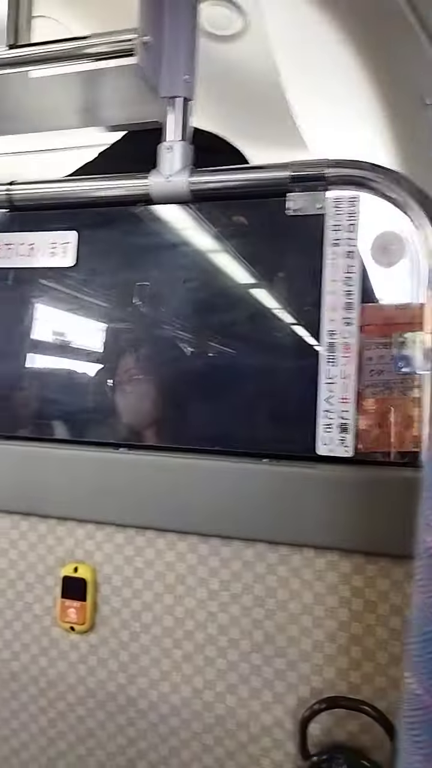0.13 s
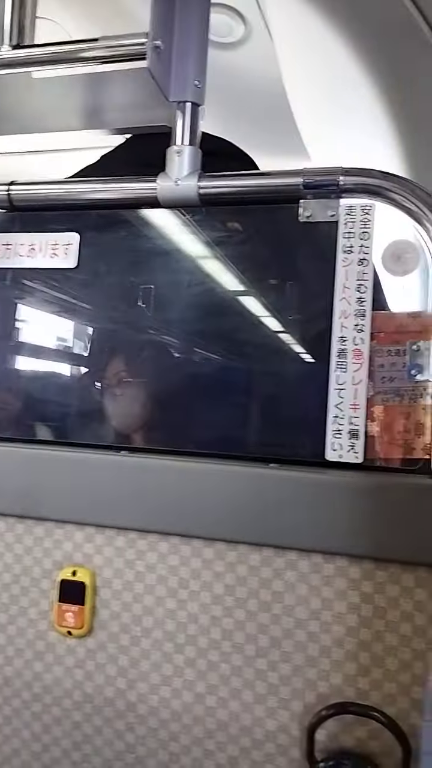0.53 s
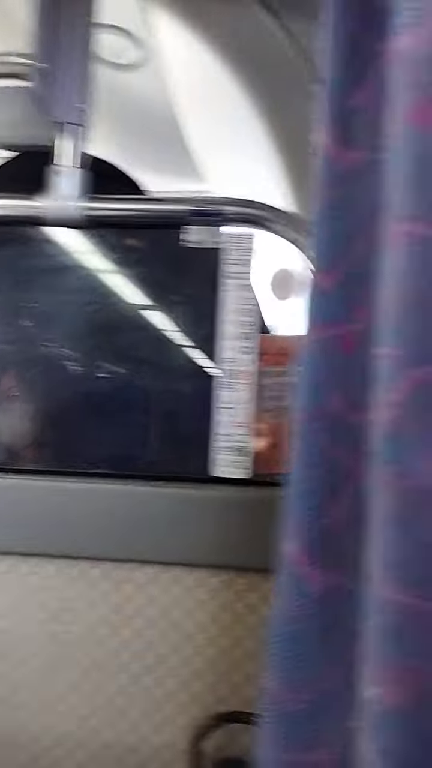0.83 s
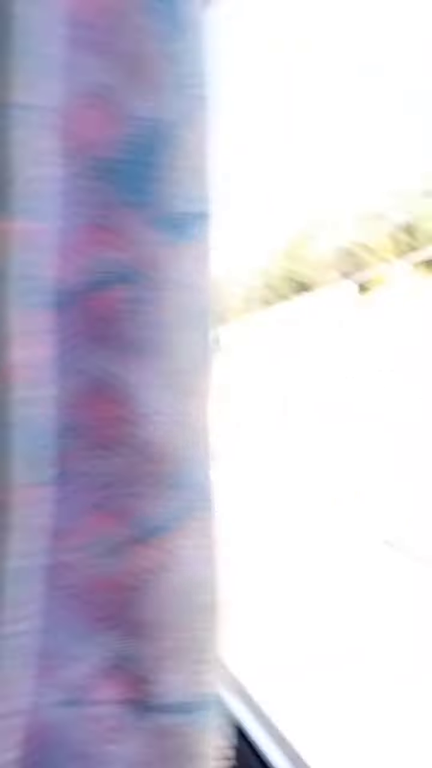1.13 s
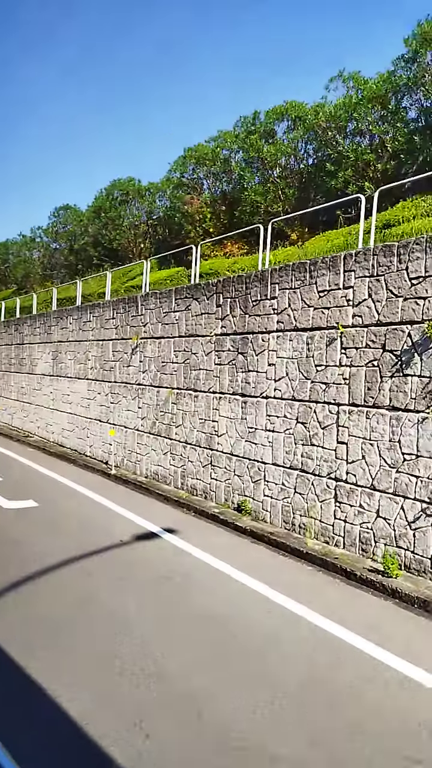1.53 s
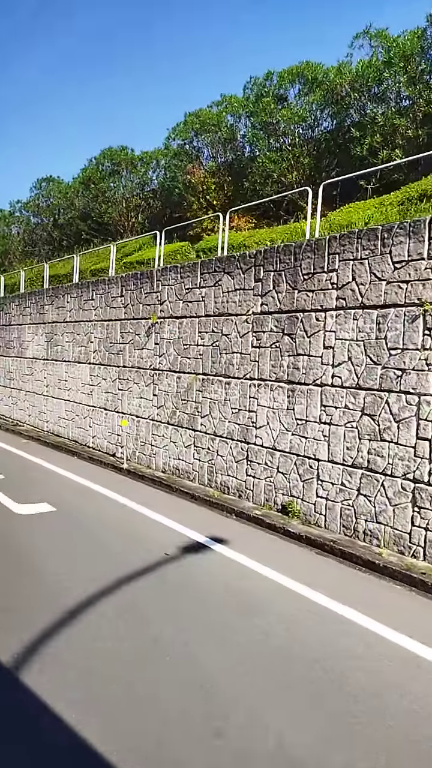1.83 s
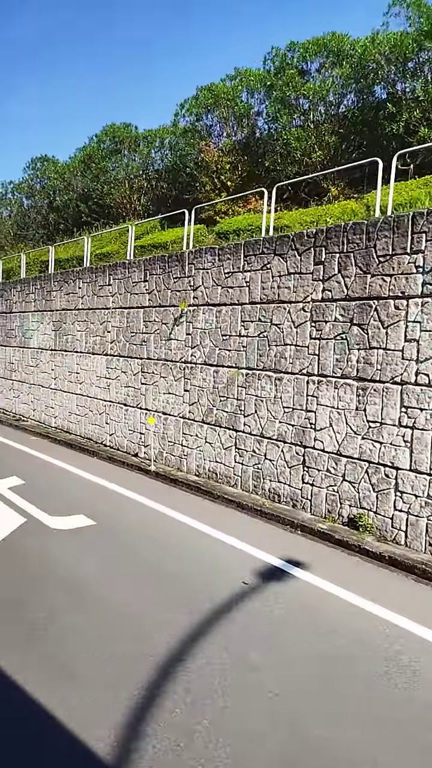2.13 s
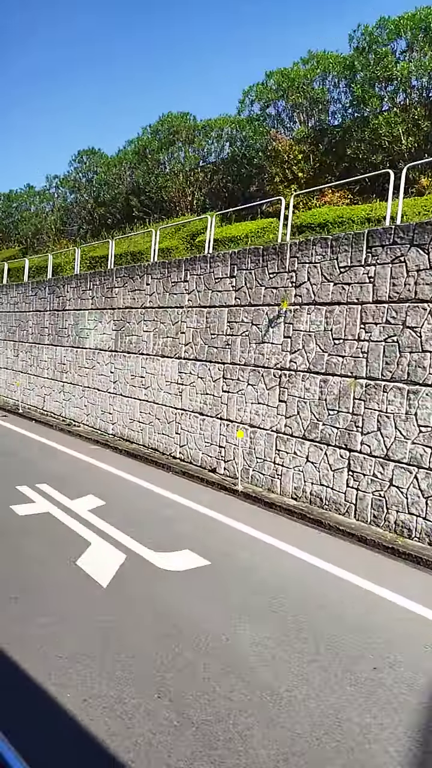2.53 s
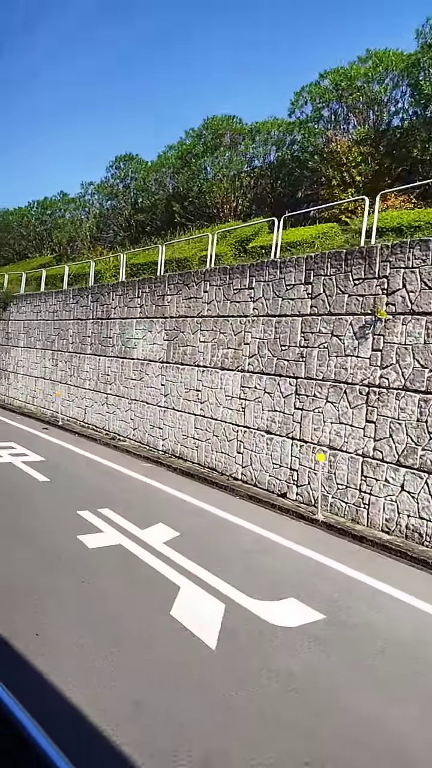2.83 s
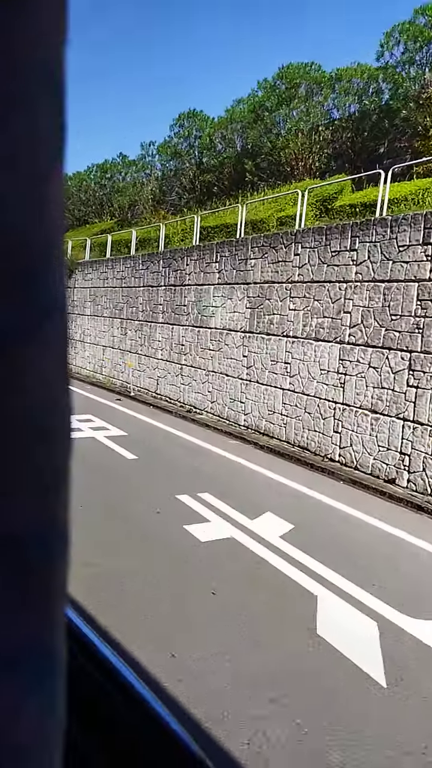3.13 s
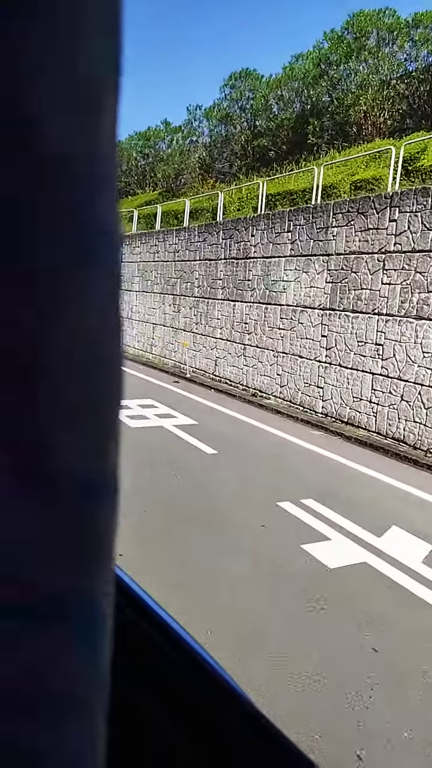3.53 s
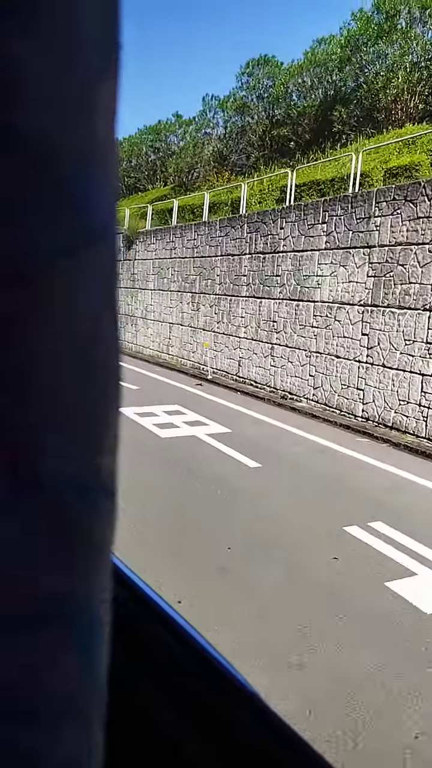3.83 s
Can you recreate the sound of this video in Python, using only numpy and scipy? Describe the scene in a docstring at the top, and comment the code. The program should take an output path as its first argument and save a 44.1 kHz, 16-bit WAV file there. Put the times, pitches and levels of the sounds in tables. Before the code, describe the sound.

A bus rumbles throughout, heard from inside, with low road noise and a wavering engine hum. From the start until about 1.7 seconds, a nearby curtain slides along its rail, hissing softly as plastic hooks click. Scattered dry ticks follow, and cloth rustles faintly on the left from 2.6 to 3.3 seconds and near 3.9. A faint ticking, probably the indicator, repeats every 0.4 seconds farther ahead.

```python
"""Inside a moving bus. Tyre and body noise, coloured by cabin resonances, rumbles under the engine's
wavering tones, and the cabin air throbs far below both. Far ahead something ticks evenly, probably the
indicator relay. Close by, a hand draws a window curtain aside: friction makes the runners hiss on the
rail, impacts set the plastic hooks ringing, and later the cloth rustles past on the left."""
import sys
import numpy as np
from scipy import signal
from scipy.fft import rfft, irfft
from scipy.io import wavfile

SR = 44100
rng = np.random.default_rng(int(sys.argv[2]) if len(sys.argv) > 2 else 0)


def wav_record(signal):
    """Record a signal, one row per channel, as 16-bit PCM in the file named by sys.argv[1]."""
    frames = np.transpose(np.atleast_2d(signal))
    bounded = np.clip(frames, -1, 1)
    # unit amplitude maps onto the largest positive 16-bit level
    quanta = np.round(bounded * 32767).astype(np.int16)
    wavfile.write(sys.argv[1], SR, quanta)


N = 176400
TIME, BIN_HZ = np.arange(N) / SR, np.fft.rfftfreq(N, 1 / SR)
BAND_EDGE_HZ = 15900


def amp(db):
    """Amplitude ratio of a level in decibels."""
    return 10 ** (np.asarray(db) / 20)


def unit(x):
    """Normalisation to rms 1."""
    return x / np.sqrt(np.mean(x ** 2) + 1e-20)


def at_hz(points, hz):
    """Interpolation of a spectrum on a log-frequency axis."""
    point_hz, value = np.transpose(points)
    return np.interp(np.log(hz + 1), np.log(point_hz + 1), value)


def curve(rows, column=1):
    """Linear interpolation of a control curve at every sample."""
    rows = np.array(rows)
    return np.interp(TIME, rows[:, 0], rows[:, column])


def add(mix, start_s, sound):
    """Superposition of a stereo sound on the mix."""
    part = mix[:, max(round(start_s * SR), 0):][:, :sound.shape[1]]
    part += sound[:, :part.shape[1]]


def pan(left_db):
    """Interchannel level difference: two gains, the left one left_db above the right."""
    return amp(np.array([left_db, -left_db]).reshape(2, -1) / 2)


def wander(rate_hz):
    """Random modulation: low-passed noise of rms 1."""
    low_pass = np.exp(-(BIN_HZ / rate_hz) ** 2) * (BIN_HZ > 0)
    return unit(irfft(rfft(rng.standard_normal(N)) * low_pass, N))


def pair(a, b, coherence):
    """Partial coherence: two independent signals mixed as mid and side."""
    mid, side = a * np.sqrt((1 + coherence) / 2), b * np.sqrt((1 - coherence) / 2)
    return np.array([mid + side, mid - side])


def colour(x, gain_db, size=2048):
    """Minimum-phase filtering at unit energy; gain_db is a function of frequency."""
    log_gain = np.log(amp(gain_db(abs(np.fft.fftfreq(size, 1 / SR)))))
    taps = np.fft.ifft(np.exp(np.conj(signal.hilbert(log_gain)))).real[:size // 2]
    return signal.fftconvolve(x, taps[None] / np.linalg.norm(taps), axes=1)[:, :x.shape[1]]


# Road noise spectrum: frequency_hz, relative_db
ROAD_SPECTRUM = [(12, -35), (20, -2), (30, -4.5), (43, -17), (70, -9), (96, -16.5), (113, -15.5),
                 (127, -18), (150, -18.5), (182, -23.5), (255, -33.5), (293, -29.5), (337, -34), (399, -35),
                 (499, -40), (607, -42), (1000, -44.5), (1220, -43.5), (1480, -45.5), (2140, -51.5),
                 (4180, -62), (7520, -70), (16000, -82)]
# Cabin resonances: centre_hz, width_hz, lift_db
CABIN_MODES = [(286, 52, 2), (587, 33, 4), (1223, 36, 3.5), (1650, 190, 2), (2125, 135, 2)]
# Likeness of left and right: frequency_hz, coherence
ROAD_COHERENCE = [(20, 0.98), (120, 1), (250, 1), (500, 0.73), (1000, 0.36), (2000, 0.08), (4000, 0),
                  (16000, 0)]
# Later arrival on the left: frequency_hz, delay_ms
LEFT_DELAY = [(100, .36), (1300, .33), (1800, .2), (7000, .14)]
# Swell of the road noise: time_s, gain_db
ROAD_ENVELOPE = [(0, 2.5), (.8, 1.5), (1.5, 1.5), (2, 0.4), (2.7, 1.5), (3.2, 0.9), (4, 1.5)]
def road(level_db=-26.5, flutter_db=0.64, floor_hz=17):
    """Forced resonance: broadband tyre and body noise excites the modes of the cabin."""
    lift_db = sum(db / (1 + (2 * (BIN_HZ - hz) / width_hz) ** 2) for hz, width_hz, db in CABIN_MODES)
    high_pass = 1 - np.exp(-(BIN_HZ / floor_hz) ** 4)
    noise = pair(*rfft(rng.standard_normal((2, N))), at_hz(ROAD_COHERENCE, BIN_HZ))
    left, right = noise * amp(at_hz(ROAD_SPECTRUM, BIN_HZ) + lift_db) * high_pass
    delay = np.exp(-2j * np.pi * BIN_HZ * at_hz(LEFT_DELAY, BIN_HZ) / 1000)
    rumble = unit(irfft(np.array([left * delay, right]), N))
    return rumble * amp(level_db + curve(ROAD_ENVELOPE) + flutter_db * wander(6.2))


# Engine and driveline tones: pitch_hz, level_db
ENGINE_TONES = [(59.3, -34.5), (125.5, -38.5), (173, -51.5), (290, -56)]
# Brief swells of cabin hum: centre_s, half_width_s, pitch_hz, level_db
CABIN_HUMS = [(1.5, 0.081, 127, -32), (3.11, .07, 123.9, -31)]
def engine(drift_hz=2.04, waver_db=2.0):
    """Frequency and amplitude modulation: low tones waver, and a hum swells twice near the second."""
    def tone(hz):
        return np.sin(2 * np.pi * np.cumsum(hz + drift_hz * wander(6.76)) / SR)
    drone = sum(amp(db) * unit(tone(hz) * amp(waver_db * wander(7.3))) for hz, db in ENGINE_TONES)
    hum = sum(amp(db) * unit(tone(hz)) * np.exp(-((TIME - centre_s) / half_width_s) ** 2)
              for centre_s, half_width_s, hz, db in CABIN_HUMS)
    return drone + hum


# Low boom: time_s, gain_db
BOOM_ENVELOPE = [(0, -3), (.3, -1), (.6, -2.5), (.85, 1), (1.1, 1), (1.3, -1.5), (1.55, -0.5), (1.8, -0.5),
                 (2.05, -1), (2.3, 1), (2.55, -3), (2.85, -2.5), (3.12, 1.5), (3.3, -2.5), (3.6, 2),
                 (3.8, -0.5), (4, -2)]
# Growl of the body: time_s, gain_db
GROWL_ENVELOPE = [(0, -0.5), (.4, 2.5), (.9, .5), (1.25, 1), (1.6, 2.5), (2.1, .5), (2.5, .5), (2.85, 1),
                  (3.1, -2.5), (3.5, 0), (4, -4)]
def band_swells(rumble):
    """Band-wise amplitude modulation: the low boom and the body's growl swell and sink irregularly."""
    def swell(envelope, centre_hz, octaves):
        band = np.exp(-(np.log2((BIN_HZ + 1) / centre_hz) / octaves) ** 4)
        return irfft(rfft(rumble) * band, N) * (amp(curve(envelope)) - 1)
    boom = swell(BOOM_ENVELOPE, centre_hz=105, octaves=0.71)
    growl = swell(GROWL_ENVELOPE, centre_hz=310, octaves=0.34)
    return rumble + boom + growl


THROB_HZ = 11.3
# Throb of the cabin air: time_s, level_db
THROB_ENVELOPE = [(0, -6), (.16, -4.5), (.24, -12), (.39, -4.5), (.5, -12), (.62, -14.5), (.73, -7.5),
                  (.92, -14), (1.17, -23.5), (1.26, -11), (1.35, -6), (1.52, -7), (1.7, -14), (1.95, -38.5),
                  (2.25, -17), (2.5, -27.5), (3.2, -22), (3.75, -18.5), (4, -26)]
def air_throb():
    """Infrasound: the cabin's air pressure oscillates about eleven times a second."""
    return np.sqrt(2) * amp(curve(THROB_ENVELOPE)) * np.cos(2 * np.pi * THROB_HZ * TIME)


# Successive ticks: gain_db, upper_modes_gain_db
RELAY_ACCENTS = [(2, 8), (7, 0), (3.5, 6.5), (-1.5, 10), (2.5, 4.5), (10, -1.5), (2.5, 7), (9, -5.5),
                 (3, 3), (6, -3)]
# Modes of the relay: pitch_hz, level_db, decay_s, delay_s
RELAY_RESONANCES = [(840, -57.5, .015, .011), (2120, -62, .016, 0), (3060, -68, .013, .001)]
# Stroke and bounce: after_s, gain_db
RELAY_IMPACTS = [(0, -1), (.01, -2)]
def relay(first_s=0.208, period_s=0.4, rise_s=0.002, scatter=0.045):
    """Damped vibration after each stroke and bounce; reflections blur every mode into a cluster."""
    out, t = np.zeros((2, N)), np.arange(SR // 8) / SR
    for k, (tick_db, upper_db) in enumerate(RELAY_ACCENTS):
        for hz, db, decay_s, delay_s in RELAY_RESONANCES:
            envelope = (1 - np.exp(-t / rise_s)) * np.exp(-t / decay_s)
            gain = amp(db + tick_db + upper_db * (hz > RELAY_RESONANCES[0][0]))
            for after_s, impact_db in RELAY_IMPACTS:
                detune, phase = rng.standard_normal((2, 12, 1))
                cluster = np.sin(2 * np.pi * (hz * (1 + scatter * detune) * t + phase)).sum(0)
                tick = unit(cluster * envelope) * np.sqrt(np.mean(envelope ** 2)) / envelope.max()
                start_s = first_s + k * period_s + delay_s + after_s
                add(out, start_s, tick * gain * amp(impact_db) * pan(0))
    return out


def friction(spectrum, slips_per_s, spread_db, hiss, coherence):
    """Stick-slip friction: tiny slips of uneven size over an even hiss."""
    sizes = amp(spread_db * np.minimum(rng.exponential(1, N), 4))
    slips = sizes * (rng.random(N) < slips_per_s / SR)
    rubbing = pair(*rng.standard_normal((2, N)), coherence) * (unit(slips) + hiss)
    return unit(colour(rubbing, lambda hz: at_hz(spectrum, hz)))


# Rustle spectrum: frequency_hz, relative_db
CLOTH_SPECTRUM = [(800, -21), (2500, -14.5), (4500, -4.5), (6700, 0), (7500, -1), (8300, -16),
                  (11000, -8.5), (15500, -9)]
# Passage of the cloth: time_s, level_db, left_db
CLOTH_MOTION = [(0, -91, -9), (2.55, -67.5, -2), (2.65, -59, 9), (2.74, -63.5, 7), (2.81, -54.5, 6),
                (2.86, -61.5, 6), (2.93, -57, 5), (3, -57, 7.5), (3.1, -60.5, 5), (3.18, -63.5, 6),
                (3.197, -49.5, 8), (3.212, -60, 7), (3.26, -60.5, 8), (3.36, -66.5, 3), (3.5, -68, -3),
                (3.84, -76, -3), (3.88, -57.5, 2), (3.93, -57.5, 6), (3.98, -71, -3)]
def cloth(flutter_db=2):
    """Friction noise of fabric brushing close by, mostly on the left."""
    rustle = friction(CLOTH_SPECTRUM, slips_per_s=690, spread_db=4, hiss=1.5, coherence=0.093)
    level_db = curve(CLOTH_MOTION) + flutter_db * wander(46)
    return rustle * amp(level_db) * pan(curve(CLOTH_MOTION, column=2))


# Modes of a runner: pitch_hz, relative_db, t60_s
RUNNER_MODES = [(2970, -4, .035), (3700, -3, .035), (4400, -6, .03), (5700, -6, .03), (7100, 0, .05),
                (7600, -1, .045), (9300, -9, .025), (14400, -10, .025)]
def runner_ring(detune, spread=0.0685, size=4096):
    """Free vibration of one plastic runner, with its own tuning and mix of damped modes."""
    t = np.arange(size) / SR
    hz, db, t60_s = np.transpose(RUNNER_MODES)[:, :, None]
    modes = amp(db - 60 * t / t60_s) * np.sin(2 * np.pi * hz * (1 + spread * detune) * t)
    return pair(*rng.standard_normal((2, len(RUNNER_MODES))), coherence=0.19) @ modes


def jingle(spread_db=4, contacts=1600):
    """Incoherent summation: light random contacts between runners merge into a rustle."""
    out = np.zeros((2, N))
    for when, strength, tuning in rng.random((contacts, 3)):
        add(out, when * N / SR, runner_ring(2 * tuning - 1, size=2048) * amp(spread_db * strength))
    return unit(out)


# Rail friction spectrum: frequency_hz, relative_db
RAIL_SPECTRUM = [(400, -7), (1500, -8), (3500, 2), (5500, -2.5), (6500, 1), (7450, -10.5), (8200, -16),
                 (11000, -8.5), (15500, -9)]
# Slide along the rail: time_s, level_db
SLIDE_ENVELOPE = [(0, -58.5), (.12, -57), (.17, -57.5), (.38, -60), (.44, -55.5), (.52, -64), (.6, -62),
                  (.7, -61.5), (.8, -62), (.9, -64.5), (.99, -71), (1.06, -62.5), (1.17, -71), (1.27, -58),
                  (1.43, -60), (1.48, -64), (1.53, -57.5), (1.58, -62), (1.63, -60), (1.8, -72), (4, -96)]
def sliding_runners(chatter_db=3.5, lag_s=0.037, flutter_db=2):
    """Sliding friction and jingling, amplitude-modulated as the throb shakes the runners."""
    rubbing = friction(RAIL_SPECTRUM, slips_per_s=1200, spread_db=2.2, hiss=1.3, coherence=0.12)
    runners = amp(-0.5) * rubbing + amp(-3.5) * jingle()
    shake_db = chatter_db * np.cos(2 * np.pi * THROB_HZ * (TIME - lag_s))
    return runners * amp(curve(SLIDE_ENVELOPE) + shake_db + flutter_db * wander(32)) * pan(-2.5)


def click(spectrum, db, low_db, top_db, left_db, scrape_db, snap_s, size=4096):
    """Impact excitation: a snap and a brief scrape ring a plastic hook, never twice quite alike."""
    rise_s, scrape_s, tail_s, left_lag_s = 0.0015, 0.0023, 0.013, 0.00014
    gain_db, ripple_db, tilt_share, neutral_low_db, neutral_top_db = 5.5, 2.5, 0.86, -20.5, -19.5
    t = np.arange(size) / SR
    envelope = (1 - np.exp(-t / rise_s)) * (np.exp(-t / scrape_s) + amp(-19) * np.exp(-t / tail_s))
    contact = pair(*rng.standard_normal((2, size)), coherence=0.11) * envelope * amp(scrape_db)
    contact[:, round(snap_s * SR)] += 1  # the snap is a unit impulse
    tilt = [(3500, low_db - neutral_low_db), (7200, 0),
            (11500, top_db - neutral_top_db), (BAND_EDGE_HZ, -0.5)]
    ripple = np.transpose([np.linspace(0, BAND_EDGE_HZ, 40), ripple_db * rng.standard_normal(40)])
    def response_db(hz):
        return at_hz(spectrum, hz) + tilt_share * at_hz(tilt, hz) + at_hz(ripple, hz)
    left, right = colour(contact, response_db)
    return np.array([np.roll(left, round(left_lag_s * SR)), right]) * amp(db + gain_db) * pan(left_db)


# Resonance of a moving hook: frequency_hz, relative_db
HOOK_SPECTRUM = [(500, -26.5), (2000, -12), (3500, -2), (5000, -6.5), (6300, -7), (7100, 2.5), (7750, -4),
                 (8300, -4), (9300, -5), (10200, -13.5), (11800, -11), (13000, -12), (14400, -9),
                 (15500, -8.5)]
# Clicks of the moving curtain: start_s, level_db, low_band_db, top_band_db, left_db, scrape_db
HOOK_IMPACTS = [(0.0468, -33, -19, -13, -7.0, -16), (0.0532, -25.5, -14, -6, -10, -19.5),
                (0.0962, -27.5, -21, -19, -7, -14), (0.1034, -34, -24, -20, -11, -16),
                (0.1087, -33, -25, -22, -4, -13), (0.2112, -24.5, -30, -20, -3.5, -11),
                (0.26, -33, -15, -12, -5, -7), (0.3102, -36.5, -22, -26, -9, -3.5),
                (0.3603, -29.5, -22, -20, -5.5, -5), (0.453, -31.5, -28, -18, -5, -11),
                (0.579, -40, -22, -25, -5, -5), (0.5873, -34.5, -28, -24, -5, -5.5),
                (0.7447, -32, -32, -23, -6.5, -6.5), (0.757, -37, -25, -30, -4, -5),
                (1.0525, -47, -28, -28, -5, -5), (1.1217, -36, -29, -30, -5, -14),
                (1.2533, -30, -16, -21, -8, -9), (1.2624, -39, -25, -22, -10, -6.5),
                (1.273, -40, -26, -24, -6, -7), (1.3239, -30, -15, -25, -8, -13),
                (1.369, -40, -19, -25, -9, -11)]
# Resonance of a dry tick: frequency_hz, relative_db
TICK_SPECTRUM = [(500, -26), (2000, -4), (3500, -1), (6000, -4.5), (7500, 0.5), (8700, -8), (11500, -8),
                 (14000, -20), (15500, -8)]
# Dry ticks of the held curtain: start_s, level_db, low_band_db, top_band_db, left_db
HELD_TICKS = [(1.813, -33.5, -39, -13, -15.5), (2.0157, -39, -13, -15, -10), (2.0853, -37, -22, -10, -11),
              (2.799, -32.5, -23, -16, -7), (2.887, -34, -6, -20, 8), (3.056, -38.5, -17, -17, -13),
              (3.6178, -37.5, -19, -23, -5), (3.873, -33, -10, -21, 1.5)]
def hooks(snap_s=0.00092, ring_db=-20.5, tick_gain_db=1):
    """Impact and resonance: hooks clatter and ring as the curtain moves, then tick as it is held."""
    out = np.zeros((2, N))
    for start_s, db, low_db, top_db, left_db, scrape_db in HOOK_IMPACTS:
        add(out, start_s, click(HOOK_SPECTRUM, db, low_db, top_db, left_db, scrape_db, snap_s))
        ring = runner_ring(detune=rng.uniform(-0.98, 1))
        add(out, start_s + snap_s, ring * amp(db + ring_db) * pan(left_db))
    for start_s, *levels_db in HELD_TICKS:
        tick = click(TICK_SPECTRUM, *levels_db, scrape_db=-17, snap_s=snap_s)
        add(out, start_s, tick * amp(tick_gain_db))
    return out


def scene():
    """Superposition of the cabin's background and the curtain close by."""
    cabin = band_swells(road() + engine()) + air_throb()
    curtain = hooks() + sliding_runners() + cloth()
    return cabin + relay() + curtain


def record(dry):
    """Band limiting by a linear-phase low-pass filter."""
    low_pass = signal.firwin(511, BAND_EDGE_HZ, window=("kaiser", 9), fs=SR)
    return signal.oaconvolve(dry, low_pass[None], "same")


dry = scene()
out = record(dry)
wav_record(out)
```